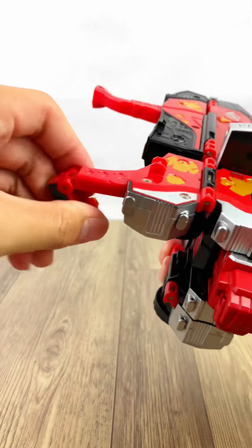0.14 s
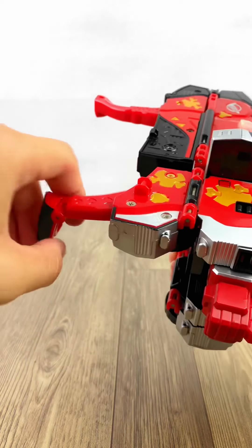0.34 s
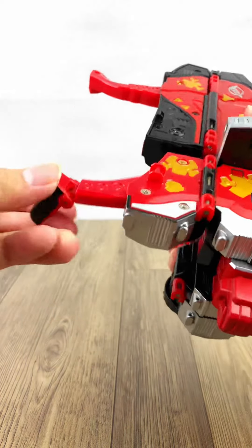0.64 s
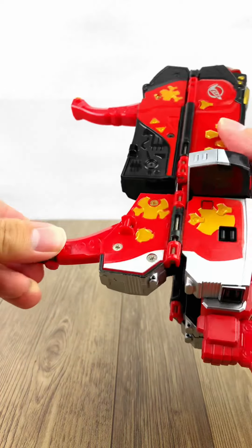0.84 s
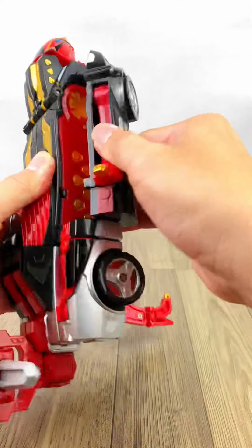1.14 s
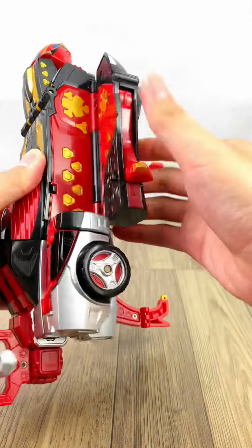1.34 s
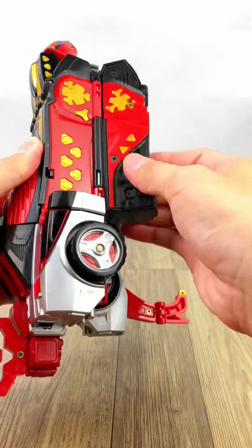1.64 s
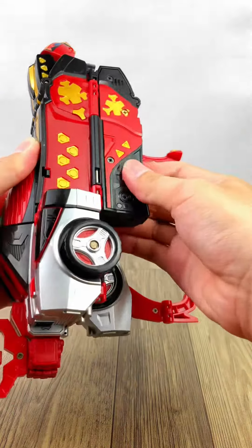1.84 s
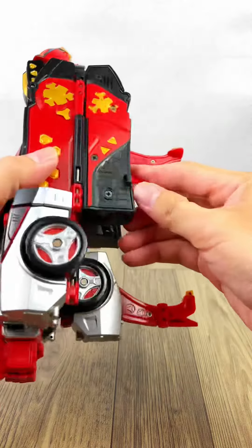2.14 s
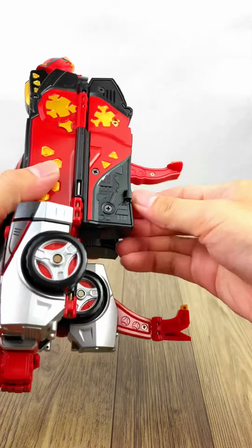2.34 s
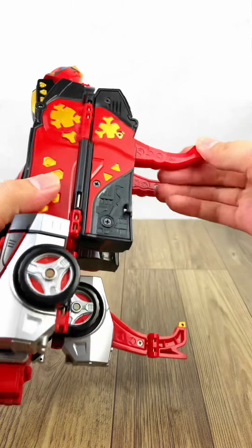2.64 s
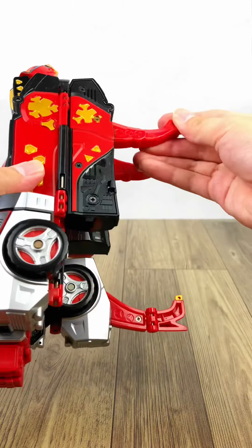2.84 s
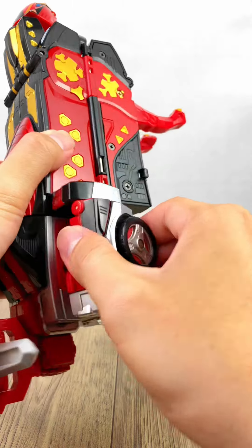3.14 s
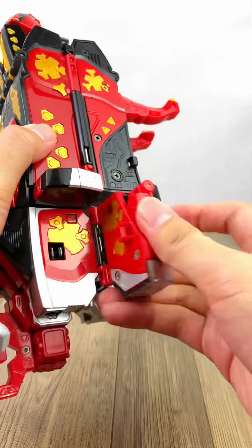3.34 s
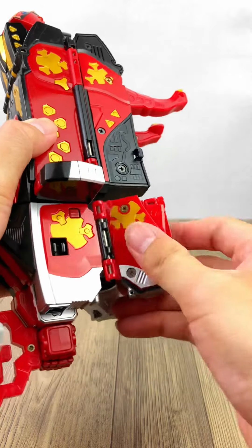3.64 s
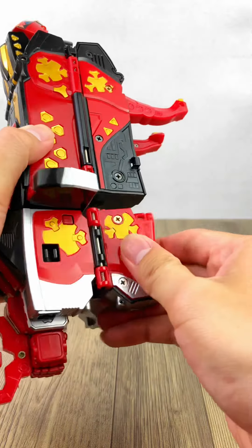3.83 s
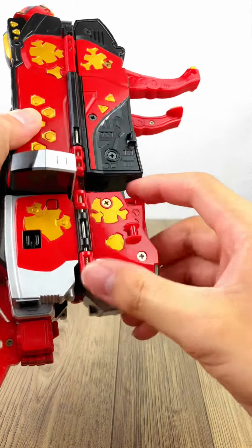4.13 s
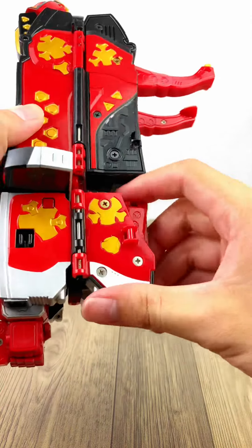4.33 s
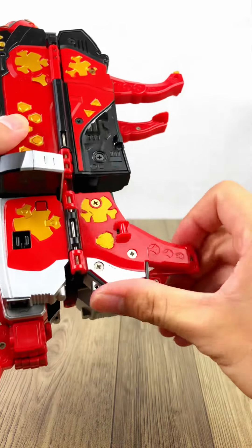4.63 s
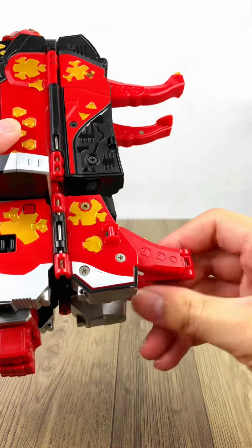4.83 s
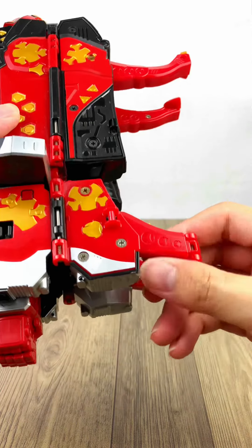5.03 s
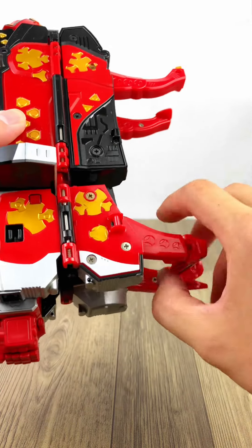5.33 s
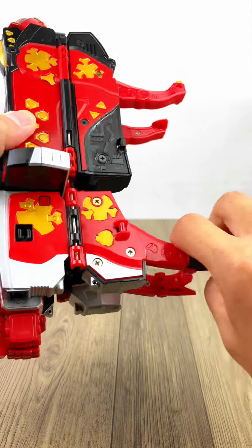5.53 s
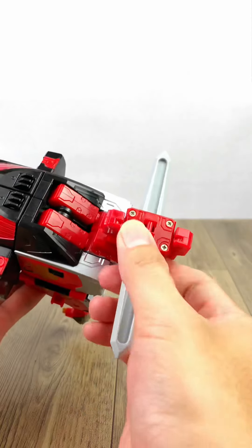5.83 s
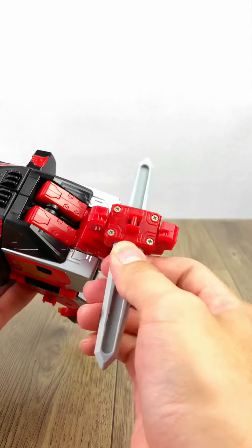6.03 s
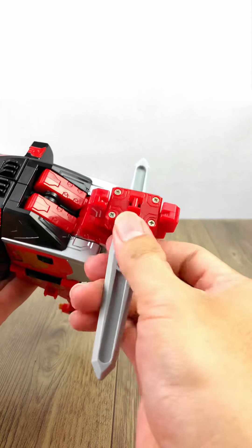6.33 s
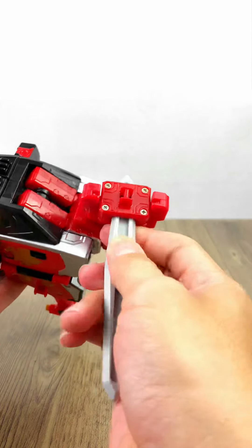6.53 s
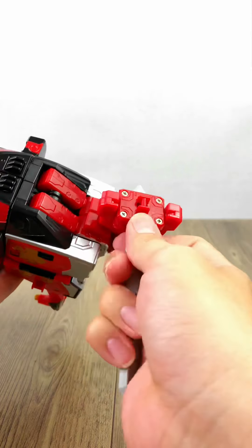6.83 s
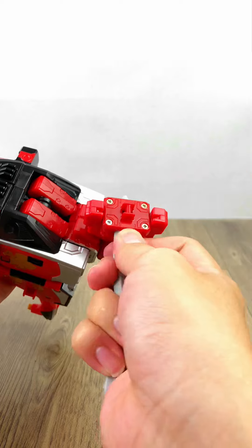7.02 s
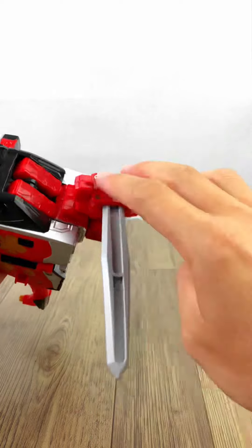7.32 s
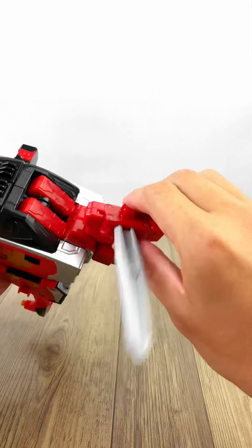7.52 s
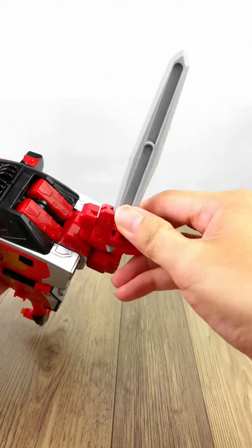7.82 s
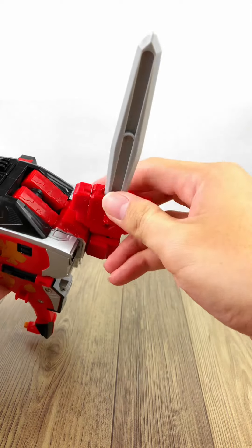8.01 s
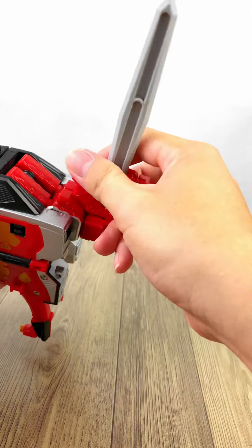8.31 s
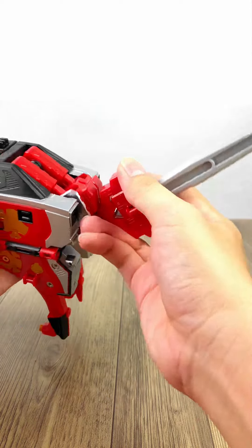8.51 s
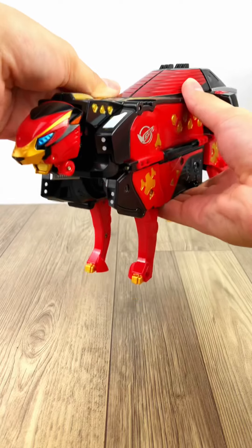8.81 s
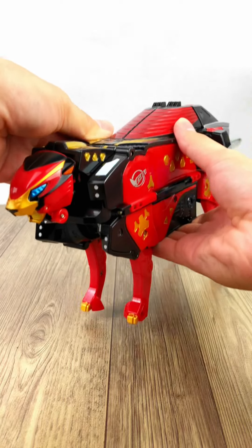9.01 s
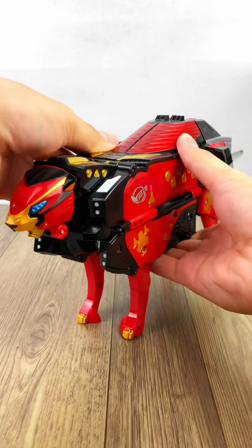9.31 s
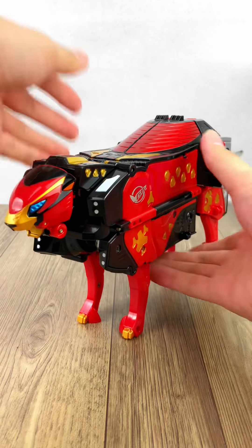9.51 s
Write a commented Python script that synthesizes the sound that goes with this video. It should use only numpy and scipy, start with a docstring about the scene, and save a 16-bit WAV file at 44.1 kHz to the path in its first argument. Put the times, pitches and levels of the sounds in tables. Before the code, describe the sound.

Close, dry plastic clicking, scraping and snapping as jointed toy parts are turned and locked, ending with a soft knock on a wooden table.

```python
"""Faint background noise is there from the start, as hands fold and lock a hollow plastic toy close by.
Each contact is a burst of uneven noise slips that rings banks of shell modes, with sparse reflections behind.
From about one second in, strong hollow clacks also shake the wooden table; later the toy knocks it outright.
Two edits, near three and nine seconds, leave short silences with only a trace of hiss.
A last few touches follow, and the background noise closes the scene."""
import sys
import numpy as np
from scipy import signal
from scipy.fft import rfft, irfft, next_fast_len
from scipy.io import wavfile
from scipy.ndimage import uniform_filter1d, minimum_filter1d

SR = 44100
rng = np.random.default_rng(int(sys.argv[2]) if len(sys.argv) > 2 else 0)


def to_wav(sig):
    """Store sig (one row per channel, or 1-D mono) as 16-bit WAV at the path in sys.argv[1].

    Samples outside -1..1 are clipped; the rate is SR.
    """
    pcm = np.clip(np.atleast_2d(sig), -1, 1) * 32767
    pcm = np.round(pcm).astype(np.int16)
    wavfile.write(sys.argv[1], SR, pcm.T)  # frames by channels


N = 426006

# background noise spectrum, relative: [f/Hz, density level/dB per Hz]
NOISE_SPECTRUM = [(15, -9), (30, -1), (58, -7.5), (92, 3), (140, -5), (300, -3.5), (700, -6.5), (1300, -18),
                  (5000, -26), (13000, -27.5), (15700, -28.5)]
# drawn level of the low background noise, as the recorder's noise suppressor lets it through
# when the toy is handled, before NOISE_LIFT_DB: [t/s, level/dB]
NOISE_LET_THROUGH = [(0, -69.5), (0.9, -78.5), (1.1, -67), (1.45, -75), (1.858, -66), (2.759, -64),
                     (3.62, -76.5), (3.939, -65), (4.23, -71.5), (5.33, -68), (6.5, -70), (8.02, -72),
                     (8.54, -59.5), (9.23, -65.5), (9.66, -80)]
# contacts: [release t/s, build-up/ms per 20 dB and die-away/ms per 20 dB before flurry() lengthens them,
#  strength level/dB, hollow body level/dB over strength, thin edges level/dB over strength, touched part f/Hz]
CONTACTS = [(0.0, 3.5, 30, -44.5, 2.5, -7, 7160), (0.048, 10.5, 26, -57, 2.5, -22, 2700),
            (0.108, 49.5, 44, -71.5, 14.5, -15, 975), (0.179, 9.5, 30, -81, 23.5, -10, 1600),
            (0.298, 7, 34, -45, -10, -9, 6340), (0.33, 7.5, 30, -49, 5, -3.5, 2640),
            (0.419, 5, 45, -62, 6.5, -30, 2620), (0.438, 20, 19, -50, 2.5, -37, 6300),
            (0.512, 5.5, 32, -54, -4.5, -28, 2600), (0.585, 8, 32, -65, -21, -14, 2600),
            (0.742, 23.5, 32, -45.5, -0.5, -13, 2630), (0.804, 0, 49.5, -55, -5, -10, 6400),
            (1.031, 9.5, 30.5, -40, 8.5, -21.5, 4270), (1.052, 6, 10, -13, -6, -9.5, 5930),
            (1.065, 11, 44, -27.5, -1, -18, 4140), (1.121, 10.5, 14.5, -6, -5.5, -15.5, 6230),
            (1.252, 41.5, 25, -46.5, 4.5, -30, 4330), (1.287, 1.5, 15, -44.5, -2, -19, 5850),
            (1.319, 42.5, 41, -43.5, 2, -44, 2390), (1.544, 31, 19, -39.5, 4.5, -48, 3320),
            (1.614, 21.5, 16.5, -49, -3, -28, 6460), (1.724, 41.5, 18, -24.5, 8, -24.5, 4200),
            (1.771, 30, 12.5, -54.5, 17, -16.5, 2690), (1.806, 7.5, 38, -45, 16, -11.5, 4000),
            (1.838, 25, 26.5, -11, 2.5, -20.5, 4780), (1.991, 21.5, 24, -29, -7, -24, 6040),
            (2.008, 23, 77, -35.5, 3.5, -19, 4000), (2.043, 9, 20, -26.5, -2.5, -14, 6400),
            (2.115, 47.5, 41, -37, 3, -16, 2980), (2.225, 1.5, 106, -57.5, 7.5, -25.5, 4100),
            (2.29, 11, 14.5, -27, -22.5, 2, 7600), (2.356, 20, 17, -20, -10.5, -5, 8040),
            (2.465, 4.5, 20, -40.5, -16, -3.5, 4020), (2.513, 11, 30.5, -29, -10, -17, 6940),
            (2.571, 6, 23, -26.5, -16, -39, 3820), (2.594, 8, 22, -42, 1, -24, 3600),
            (2.662, 15, 19.5, -21.5, -7, -8, 3970), (2.724, 13, 19, -30, -14.5, -10, 3770),
            (2.751, 15, 5, -35.5, -29, -5, 7900), (2.795, 5, 21, -33, -25, -23, 3900),
            (2.846, 15.5, 17, -32.5, -5.5, -23, 3620), (2.882, 2.5, 35.5, -47, 2, -36.5, 3590),
            (3.152, 31.5, 11.5, -21, -4, -22, 2830), (3.183, 10, 17.5, -11.5, -2.5, 3.5, 6950),
            (3.204, 36, 2, -10.5, -13.5, -10, 6800), (3.31, 11.5, 19, -35.5, -6.5, -7, 6360),
            (3.325, 10, 35.5, -43.5, 3, -9, 6800), (3.39, 45, 35, -47, -6.5, -33, 5590),
            (3.672, 11.5, 11.5, -36.5, -14.5, -36, 6700), (3.756, 33.5, 3, -20.5, -6, -13.5, 4870),
            (3.781, 1.5, 12, -29, -4, -7, 2500), (3.811, 34.5, 31, -23, -4, -6, 6000),
            (3.87, 8.5, 4, -13.5, -12, -26.5, 5260), (3.893, 16, 23, -5, -11.5, -18.5, 2900),
            (3.905, 31, 11.5, -13.5, -1.5, 1, 2820), (4.033, 8, 33.5, -37.5, -4.5, -7, 6600),
            (4.058, 25.5, 26, -28, -8, -10, 6900), (4.135, 0.5, 14, -35.5, -11, -12.5, 5110),
            (4.22, 40.5, 38, -61, -16.5, -18.5, 5420), (4.311, 6.5, 49, -68, 12.5, -20, 1545),
            (4.359, 2, 57.5, -57, -1.5, -17, 2750), (4.411, 14.5, 48, -32, -5.5, -10.5, 5830),
            (4.444, 10.5, 24.5, -43, 7, -11, 5640), (4.472, 8, 16.5, -28, -11, -20, 7000),
            (4.522, 11, 22.5, -19.5, -7, -10, 4460), (4.574, 9, 8, -36.5, -7.5, -6.5, 5670),
            (4.634, 15.5, 8, -5.5, -8, -8, 9700), (4.736, 8, 14.5, -24.5, -9, 0, 9370),
            (4.864, 47, 40, -59, -20, -18, 5580), (4.889, 1.5, 9, -35, -16, -7, 5450),
            (4.909, 24, 22, -44, -3, -16, 5330), (5.025, 20.5, 6, -29, -8, -11, 6600),
            (5.074, 8, 38, -49, -4.5, -26, 5500), (5.134, 31, 41, -60, -21, -28, 5560),
            (5.182, 12.5, 36.5, -33.5, -6.5, -5.5, 8400), (5.255, 6, 31.5, -34.5, 0, -8.5, 6550),
            (5.282, 31, 0, -41, 0.5, -3, 9500), (5.305, 2.5, 7.5, -33, -7.5, -22, 6360),
            (5.328, 16, 14, -33, -6, -13, 5840), (5.421, 18.5, 39, -23.5, -7, -11, 6300),
            (5.548, 14, 21, -14, -8.5, -16, 6800), (5.583, 18, 9, -17, -5, -20, 6700),
            (5.646, 5.5, 10, -29, -12, -6, 6040), (5.682, 39.5, 12.5, -36.5, 2.5, -2.5, 6330),
            (5.716, 18, 34.5, -45.5, -9, -19, 5900), (5.801, 6, 5, -49.5, -20, -17, 5610),
            (5.915, 7, 21, -57.5, -6, -16, 5540), (6.043, 11, 18, -29.5, 11, -19, 2800),
            (6.059, 3.5, 24.5, -21.5, -2.5, -30, 5540), (6.087, 8, 22, -14, 1, -15.5, 5750),
            (6.155, 3.5, 20, -50.5, 18.5, -18, 2330), (6.188, 51, 32, -35, -4, -14.5, 6800),
            (6.243, 63, 13, -65, 22, 2, 2530), (6.279, 11.5, 42, -53, 5.5, -27, 5540),
            (6.316, 35.5, 42, -65, 9, -16, 5270), (6.432, 12.5, 69.5, -36, -5.5, -4.5, 4160),
            (6.483, 42, 8, -37, 8.5, -17, 4130), (6.503, 0, 47, -38.5, -5, -26, 7100),
            (6.548, 24, 31, -23, 1, -6.5, 4320), (6.609, 9, 36.5, -41.5, 6, -18, 2500),
            (6.673, 30.5, 24, -70, 19, 1, 2450), (6.724, 9, 42, -73.5, 21, -13, 1200),
            (6.811, 9.5, 59, -65.5, 6, 2, 5180), (6.86, 50.5, 35, -57, 3.5, -5, 3880),
            (6.887, 14.5, 26, -41, -13.5, -32, 7100), (6.958, 7.5, 40, -29, -2.5, -10, 6350),
            (6.984, 28.5, 26.5, -20, -1.5, -11, 7500), (7.087, 5, 36, -40, -6.5, -17, 7200),
            (7.111, 5, 82, -54.5, 2.5, -17, 6350), (7.181, 12.5, 9, -36, -14, -8, 7100),
            (7.217, 47, 38, -42.5, 5.5, -7.5, 6300), (7.3, 8, 27.5, -44, -3.5, -1, 8240),
            (7.332, 25, 33.5, -37, 2.5, -10, 2535), (7.358, 20.5, 10, -41, 12, -19, 2520),
            (7.584, 19.5, 38, -45.5, 6.5, -2, 2550), (7.647, 40, 42.5, -72, 11.5, -12, 2430),
            (7.717, 5.5, 26, -52.5, -1.5, -0.5, 8570), (7.82, 5, 43.5, -55.5, 0, -12, 4160),
            (7.861, 26, 26, -48, 1.5, -12, 3400), (7.893, 4, 25, -47.5, 9.5, -30, 2450),
            (8.005, 20.5, 47.5, -57.5, -7.5, -9, 6840), (8.129, 7.5, 26, -53, 3, -18.5, 2740),
            (8.257, 8, 65, -58, 9, -28, 2400), (8.311, 3.5, 30.5, -29.5, 0.5, -8, 6700),
            (8.358, 3, 33.5, -48.5, 19, -20.5, 2470), (8.406, 35.5, 26, -29.5, -1, -6, 7200),
            (8.435, 12.5, 17, -14.5, -2.5, -12.5, 6570), (8.524, 2, 27, -41, 2.5, -39, 4000),
            (8.564, 18, 34, -24.5, -4.5, -13, 6130), (8.595, 12.5, 50, -24.5, -1.5, -14, 6130),
            (8.628, 21, 35.5, -22, -2, -13, 4940), (8.665, 10, 17, -57, 14, -12, 6000),
            (9.16, 10, 39, -56, -7, -9, 2422), (9.19, 30.5, 24, -27.5, 5, -14.5, 2390),
            (9.405, 12, 19, -57, -21, -23, 3220), (9.487, 1, 43, -65, 3, -15, 3260)]
# what the hands work on: [from t/s, hollow f/Hz, hollow base lift level/dB, lowest radiated f/Hz for light contacts,
#  bare crack base level/dB over strength, idly touched part f/Hz, idle touch mean level/dB]
STAGES = [(0, 1600, -3, 740, -32, 2620, -71), (1.0, 1450, 2.5, 615, -21.5, 4360, -64),
          (1.64, 1048, 13, 516, -24, 2500, -62.5), (1.8, 1524, 9, 540, -26, 4000, -63.5),
          (2.25, 1455, 6.5, 744, -24, 3710, -62.5), (3.1, 1463, 7.5, 610, -22, 2655, -70),
          (3.98, 2010, 2.5, 807, -13, 5500, -68), (4.2, 1020, 9.5, 737, -21, 5500, -65.5),
          (5.2, 1406, 0, 746, -28.5, 5500, -65), (5.95, 967, 11.5, 655, -14.5, 5310, -76),
          (6.6, 992, 7, 710, -16, 2445, -57), (7.05, 993, 11.5, 733, -7.5, 2530, -69),
          (7.5, 1794, 0.5, 798, -8.5, 2507, -69), (8.3, 1020, 12.5, 844, -16, 6020, -61),
          (9.1, 900, 4, 600, -11, 3260, -83.5)]
# modes of the hollow body, before each grip detunes them: [f/Hz, width/Hz, level/dB]
HOLLOW_MODES = [(542, 38, -2), (856.5, 17, -10.5), (1020, 76, 5), (1365, 110, 2.5), (1600, 380, 2.5),
                (1980, 230, -0.5), (2450, 150, -3.5)]
# modes of the panels, likewise: [f/Hz, width/Hz, level/dB]
PANEL_MODES = [(3130, 610, -13), (3650, 510, -6), (4410, 240, -2.5), (5300, 240, -1), (5450, 390, -5),
               (5990, 130, 2), (6800, 210, 3), (7660, 610, -7)]
# modes of the thin edges, likewise: [f/Hz, width/Hz, level/dB]
EDGE_MODES = [(9100, 400, 17), (9800, 64, 4), (11200, 900, -28)]
# broad microphone lift near 15 kHz, heard on the crack; varied contact by contact too: [f/Hz, width/Hz, level/dB]
MICROPHONE_LIFT = [(14940, 4800, 5.8)]
# upper limits of hollow body, panels, edges and bare crack: [f/Hz]
GROUP_TOPS = [2400, 8200, 11000, 17000]
# reflections: [f/Hz, time to fall 60 dB/s]
ROOM_DECAY = [(500, 0.14), (2000, 0.21), (8000, 0.11), (15000, 0.13)]
# knocks on the table: [t/s, rocking/ms, die-away/ms per 20 dB before flurry() lengthens it,\
#  bounce on the legs level/dB, top level/dB, overtones level/dB]
KNOCKS = [(2.347, 5, 32, -47, -33.5, -39.5), (2.739, 3, 15, -58, -48.5, -62),
          (5.184, 5, 28, -62, -54.5, -62), (8.132, 21, 18.5, -37, -64, -38.5),
          (8.48, 19, 28, -35, -45, -46), (8.528, 12, 30, -40, -51, -64), (8.67, 15, 30, -47.5, -55, -49),
          (9.181, 5.1, 58, -11.5, -16.5, -30.5), (9.42, 16, 35, -63, -75, -79)]
# table modes, one list each for legs, top, overtones: [f/Hz, width/Hz before table() broadens it, level/dB]
TABLE_MODES = [
    [(39.3, 89, -8.5), (66, 36, 8.5), (100, 50, -5)],
    [(190, 30, 7), (260, 72, 5)],
    [(457, 66, -6), (536, 36, -4)],
]
# edits: [from t/s, to t/s]
SILENCES = [(2.931, 3.1), (8.695, 9.152)]

NOISE_LIFT_DB = 4  # whole background noise above the mean of its level curve
IDLE_RISE_MS, IDLE_FALL_MS = 15, 51  # mean times per 20 dB, before flurry() lengthens them
IDLE_SPREAD_DB, IDLE_EDGES_DB = 1, -18
CRACK_GROWTH, CRACK_EDGE_SHARE = .3, .2  # dB of crack per dB of strength, and per dB of edges
DEEPER = 0.09  # share by which the hardest contacts reach lower
SNAP_SHARE, SNAP_BELOW_MS = 0.58, 35  # short flurries peak in one clean blow
ROOM_DB = -18  # reflections under the dry toy
KNOCK_RISE_MS, SHAKE_FALL_MS, SHAKE_HOLD_MS = 9, 32, 6  # rise and fall per 20 dB, before flurry()
SHAKE_FROM_DB = -29  # hollow clacks above this level also shake the table
SHAKE_DB = [-38.5, -36, -32]  # legs, top, overtones, relative to the clack
EDGE_HZ, PEAK = 15850, .97  # band limit; limiter ceiling, full scale 1


def gain_of(db):
    """Decibels to gain."""
    return 10 ** (np.asarray(db) / 20)


def evened(x):
    """Scales to rms 1."""
    return x / np.sqrt(np.mean(x ** 2) + 1e-20)


def read(points, hz):
    """Reads a table along log frequency."""
    f, value = np.transpose(points)
    return np.interp(np.log(hz + 1), np.log(f + 1), value)


def add(mix, s, sound):
    """Mixes a sound in from time s."""
    at = round(s * SR)
    sound = sound[max(-at, 0):]
    part = mix[max(at, 0):][:len(sound)]
    part += sound[:len(part)]


def background_noise():
    """Faint shaped noise in drifting patches; its low part follows the noise suppressor's level curve most."""
    frames, hz = N // 256 + 5, np.fft.rfftfreq(1024, 1 / SR)
    real, imaginary, patches = rng.standard_normal((frames, 513, 3)).T
    patches = uniform_filter1d(patches, size=10, axis=0)
    patches = evened(uniform_filter1d(patches, size=14, axis=1))
    curve_db = np.interp(np.arange(frames) * 256 / SR, *np.transpose(NOISE_LET_THROUGH))
    mean_db = curve_db.mean()
    share = .5 + .5 / (1 + (hz / 1500) ** 2)  # treble follows half as much
    level_db = read(NOISE_SPECTRUM, hz)[:, None] + 0.83 * patches + share[:, None] * (curve_db - mean_db)
    spectrum = (real + 1j * imaginary) * gain_of(level_db)
    noise = signal.istft(spectrum, nperseg=1024, noverlap=768)[1][:N]
    return gain_of(NOISE_LIFT_DB + mean_db) * evened(noise)


def flurry(rise_ms, fall_ms, snap_db=0, hold_ms=0):
    """Envelope: builds up, jumps at the release, holds, dies away; returns its lead time in s too."""
    rise_ms, fall_ms, hold_ms = abs(rise_ms) + 0.53, abs(fall_ms) + 0.27, abs(hold_ms)
    lead_ms = min(2 * rise_ms, 110)
    length_ms = lead_ms + hold_ms + min(3 * fall_ms, 170) + 60
    size = next_fast_len(round(length_ms * SR / 2000), real=True) * 2  # even, quick to transform
    ms = np.arange(size) / SR * 1000 - lead_ms  # 0 at the release
    rise_db = 20 * ms / rise_ms - snap_db
    fall_db = -20 * np.maximum(ms - hold_ms, 0) / fall_ms + snap_db * np.exp(-abs(ms) / 0.78)
    fade_in = np.clip((ms + lead_ms) / (.5 * lead_ms), 0, 1)
    return lead_ms / 1000, gain_of(np.where(ms < 0, rise_db, fall_db)) * fade_in


def clean_blow(shape):
    """A single impulse at the envelope's peak, with the energy of the whole envelope."""
    return np.linalg.norm(shape) * (np.arange(len(shape)) == shape.argmax())


def ringing(hz, modes):
    """Complex response of a set of damped modes, neighbours in opposite sign."""
    return sum((-1) ** k * gain_of(db) * hz * width / (hz * width + 1j * (hz ** 2 - f ** 2))
               for k, (f, width, db) in enumerate(modes))


def scaled(spectrum, shape, db):
    """Back to time, at db where the envelope shape is 1."""
    part = irfft(spectrum)
    return gain_of(db) * part * np.linalg.norm(shape) / np.linalg.norm(part)


def stage(s):
    """The stage of work at time s, without its start time."""
    return [row for row in STAGES if row[0] <= s or row is STAGES[0]][-1][1:]


def idle_touches(count):
    """Faint touches at random moments, as rows like those of the contacts."""
    rows = []
    for k, (when, rise, fall, a, b) in enumerate(rng.random((count, 5))):
        s = (k + when) / count * N / SR
        part_hz, db = stage(s)[4:]
        rise_ms, fall_ms = 2 * rise * IDLE_RISE_MS, (.5 + fall) * IDLE_FALL_MS
        strength_db = db + IDLE_SPREAD_DB * (2 * a - 1)
        hollow_db = IDLE_SPREAD_DB * 2 * b
        rows.append((s, rise_ms, fall_ms, strength_db, hollow_db, IDLE_EDGES_DB, part_hz))
    return rows


def contact(row, chance, grip):
    """Uneven slips ring three groups of modes, crack above them, and are also heard bare."""
    s, rise_ms, fall_ms, db, hollow_db, edges_db, part_hz = row
    hollow_hz, hollow_lift_db, low_hz, crack_db = stage(s)[:4]
    # harder contacts, and those on the edges, crack more
    crack_db = crack_db + CRACK_GROWTH * (db + 19.5) + CRACK_EDGE_SHARE * (edges_db + 15)
    levels_db = db + np.array([hollow_db, 0, edges_db, crack_db])

    lead, shape = flurry(rise_ms, fall_ms, snap_db=5.7 * np.exp(-abs(rise_ms) / 15))  # quick releases snap
    blow_share = SNAP_SHARE * np.exp(-((rise_ms + fall_ms) / SNAP_BELOW_MS) ** 2)
    slips, bare = rfft(chance[:, :len(shape)] * shape + blow_share * clean_blow(shape))

    hz = np.fft.rfftfreq(len(shape), 1 / SR)
    lowest_hz = low_hz * np.interp(levels_db[0], [-35, -12], [1, 1 - DEEPER])
    limits = [lowest_hz] + GROUP_TOPS
    gentle = np.clip((-28.5 - max(levels_db)) / 30, 0, 1)  # a light touch stirs little but the part itself
    bare_gain = gain_of(-7.5 - 5.6 * gentle)
    stand_outs = ((hollow_hz, hollow_lift_db), (part_hz, 2.5))
    groups = (HOLLOW_MODES, PANEL_MODES, EDGE_MODES, MICROPHONE_LIFT)
    out = 0
    for modes, lo, hi, level_db, shift in zip(groups, limits, GROUP_TOPS, levels_db, grip):
        # each contact detunes the resonances and shifts their levels, and what is touched stands out
        held = [(f * (1 + .03 * a), w, g + 2.5 * b) for (f, w, g), a, b in zip(modes, shift, shift[::-1])]
        held += [(f, .07 * f, g + 11 * gentle) for f, g in stand_outs if lo < f < hi]
        band = ((1 + (lo / (hz + 1)) ** 16) * (1 + (hz / hi) ** 10)) ** -.5
        rung = slips * ringing(hz, held)
        out = out + scaled(band * (rung + bare_gain * bare), shape, level_db)
    return s - lead, out


def toy():
    """All contacts and idle touches of the plastic shell, each with its own slips and grip."""
    size = 16000  # samples, longer than any flurry
    out = np.zeros(N)
    for row in idle_touches(count=70) + CONTACTS:
        grip = rng.standard_normal((4, 8))
        clumps, *slips = rng.standard_normal((3, size))
        lumps = gain_of(3.5 * evened(uniform_filter1d(clumps, size=40)))  # slips come in clumps
        ticks = 1 + 1.3 * (abs(clumps) > 2.9)  # a few catch and let go hard
        add(out, *contact(row, lumps * ticks * slips, grip))
    return out


def room(x):
    """Sparse reflections of random sign, each band dying at its own speed; three tails take turns."""
    out, turn = np.zeros(N), np.arange(N) / SR * 3.1
    for k in range(3):
        taps = np.zeros(SR // 2)
        at = np.arange(200, len(taps) - 20, 20)
        taps[at + rng.integers(0, 20, len(at))] = rng.choice([-1., 1.], len(at))
        hz, t, z = signal.stft(taps, SR, nperseg=256)
        fading = gain_of(-60 * t / read(ROOM_DECAY, hz)[:, None])
        tail = signal.istft(z * fading, SR, nperseg=256)[1]
        window = np.sqrt(2 / 3) * np.cos(np.pi * (turn + k / 3))  # the three powers sum to 1
        out += signal.fftconvolve(x * window, tail / np.linalg.norm(tail))[:N]
    return gain_of(ROOM_DB) * out


def table():
    """A blow amid uneven rocking rings the table; each mode is applied twice, so little spills above it."""
    out = np.zeros(N)
    shakes = [(s, SHAKE_HOLD_MS, SHAKE_FALL_MS, *(db + hollow_db + np.array(SHAKE_DB)))
              for s, _, _, db, hollow_db, *_ in CONTACTS if db + hollow_db > SHAKE_FROM_DB]
    rocking = rng.standard_normal((60, 16000))
    for (s, hold_ms, fall_ms, *levels_db), chance in zip(KNOCKS + shakes, rocking):
        lead, shape = flurry(KNOCK_RISE_MS, fall_ms, hold_ms=hold_ms)
        pushes = rfft(chance[:len(shape)] * shape + 0.49 * clean_blow(shape))
        hz = np.fft.rfftfreq(len(shape), 1 / SR)
        for modes, db in zip(TABLE_MODES, levels_db):
            # squaring narrows a mode and doubles its dB, so it starts broader and at half the dB
            response = sum(ringing(hz, [(f, 1.5 * abs(width), g / 2)]) ** 2 for f, width, g in modes)
            add(out, s - lead, scaled(pushes * response, shape, db))
    return out


def scene():
    """Toy, its reflections, table and background noise."""
    plastic = toy()
    return (plastic + room(plastic) + table() + background_noise())[None]


def record(dry):
    """The edits mute the sound down to a trace of hiss; a quick limiter holds the peaks; band limit."""
    t = np.arange(N) / SR
    on = np.prod([(t < a) | (t > b) for a, b in SILENCES], axis=0)
    hiss = gain_of(-99.5) * rng.standard_normal(N)
    edited = dry * uniform_filter1d(on.astype(float), size=90) + hiss
    allowed = minimum_filter1d(PEAK / np.maximum(abs(edited), PEAK), size=81)
    limited = edited * uniform_filter1d(allowed, size=41)
    low_pass = signal.firwin(1023, EDGE_HZ, window=("kaiser", 9), fs=SR)
    return signal.oaconvolve(limited, low_pass[None], "same")


dry = scene()
out = record(dry)
to_wav(out)
```